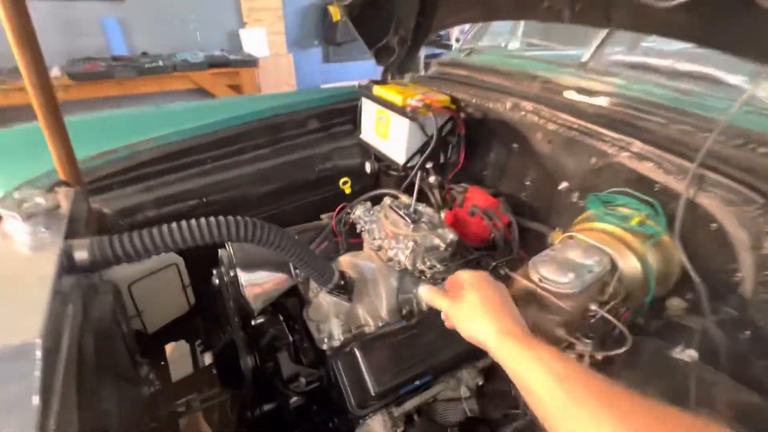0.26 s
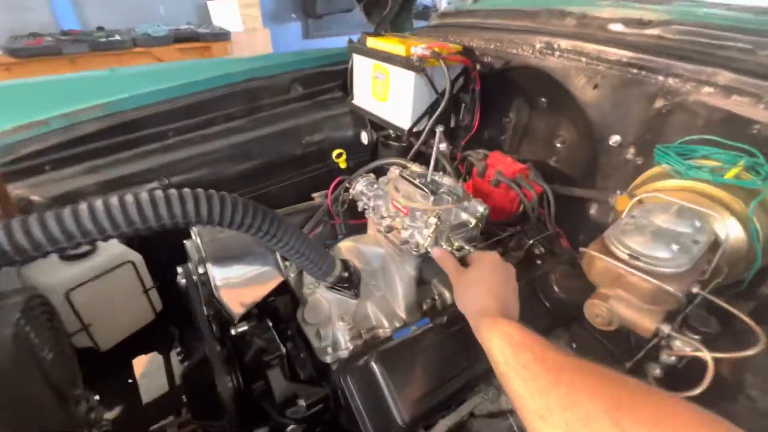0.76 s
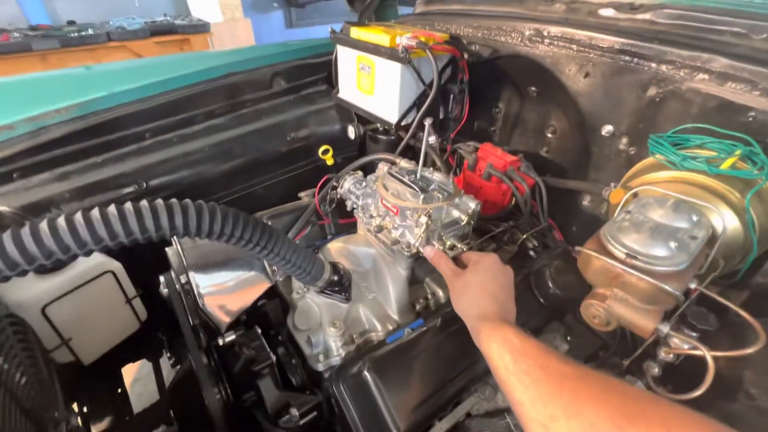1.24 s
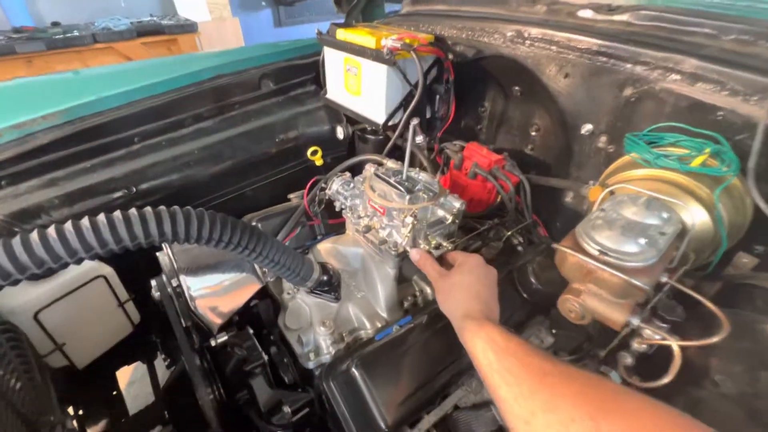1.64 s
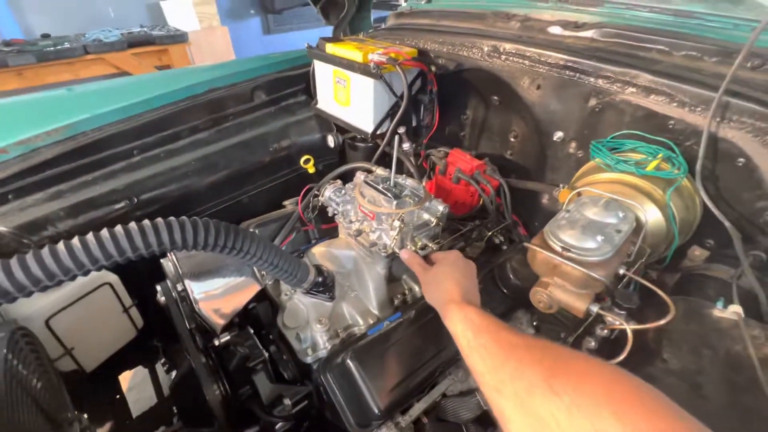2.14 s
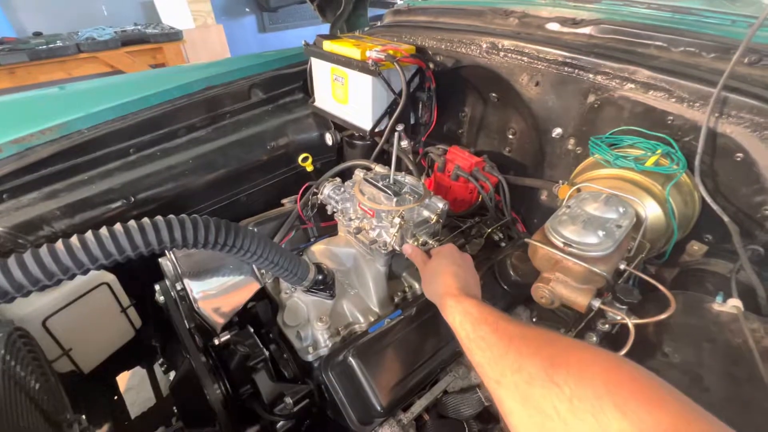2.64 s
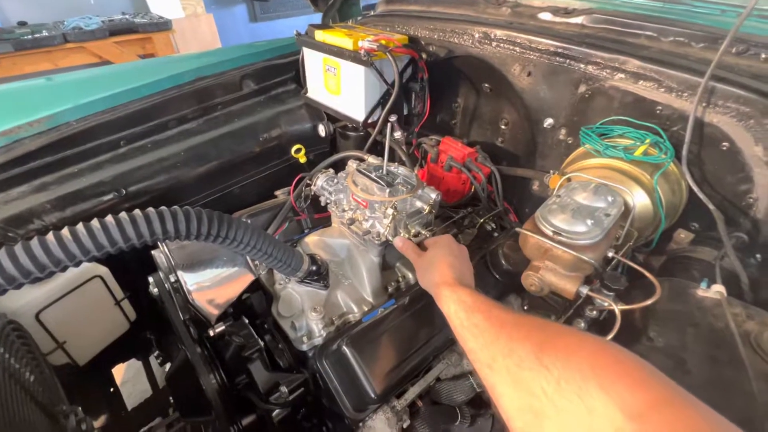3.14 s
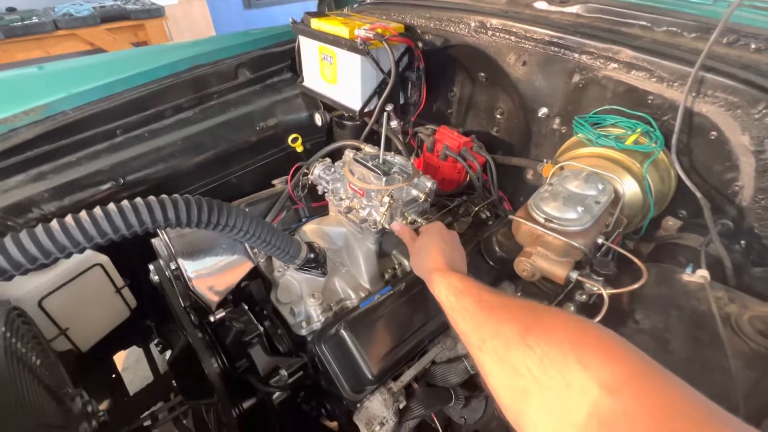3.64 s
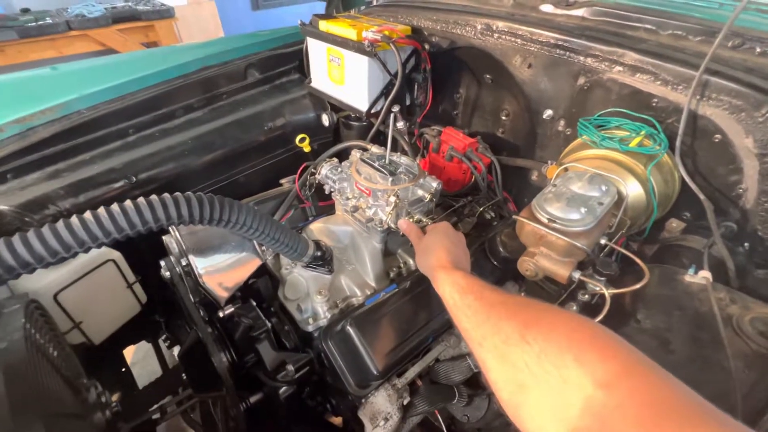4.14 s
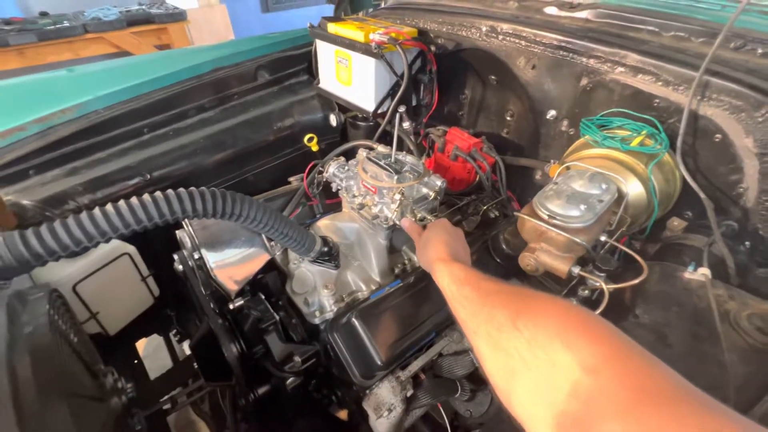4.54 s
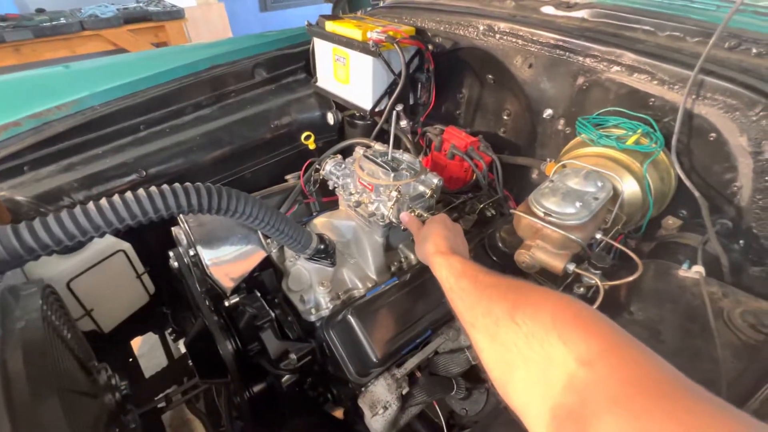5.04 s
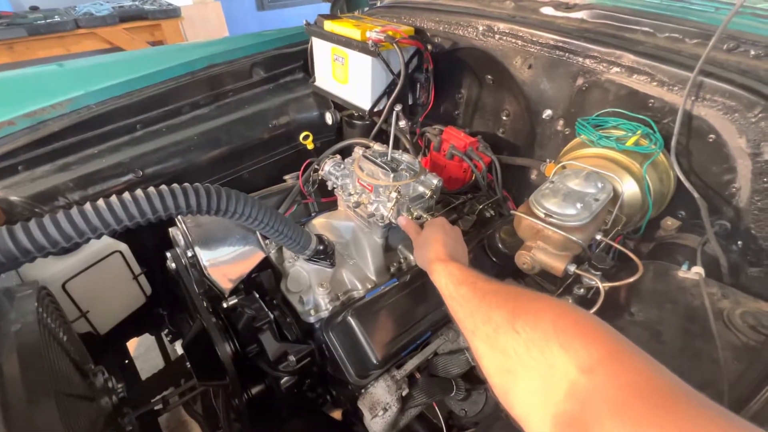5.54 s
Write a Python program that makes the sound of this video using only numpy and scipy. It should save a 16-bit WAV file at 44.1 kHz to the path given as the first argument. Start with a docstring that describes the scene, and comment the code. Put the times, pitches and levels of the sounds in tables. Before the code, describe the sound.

Close above an open engine bay, a throaty V8 burbles and is revved in four quick blips, with roaring intake air and ticking valves.

```python
"""An eight-cylinder engine runs with its bonnet open while a hand blips the throttle, heard from above the bay.
Uneven firings thud and ring the exhaust pipe; sine tones at multiples of the engine cycle follow its speed.
Shaped noise makes the air roaring into the carburettor, the fan and belt hiss, the pipe hum and throttle blasts.
Valve gear taps ring the panels, one valve ticks once a cycle in noise bursts, the intake gasps now and then,
and one metal part pings as a dying sine."""
import sys
import numpy as np
from scipy import signal
from scipy.fft import rfft, irfft, next_fast_len
from scipy.io import wavfile
from scipy.ndimage import uniform_filter1d, map_coordinates

SR = 44100
rng = np.random.default_rng(int(sys.argv[2]) if len(sys.argv) > 2 else 0)


def wav_record(signal):
    """Record a signal, one row per channel, as 16-bit PCM in the file named by sys.argv[1]."""
    frames = np.transpose(np.atleast_2d(signal))
    bounded = np.clip(frames, -1, 1)
    # unit amplitude maps onto the largest positive 16-bit level
    quanta = np.round(bounded * 32767).astype(np.int16)
    wavfile.write(sys.argv[1], SR, quanta)


N = 254898

# Engine speed: (t/s, firing rate/Hz)
SPEED = [(0, 56), (.13, 56.5), (.25, 54.5), (.6, 54), (.73, 51), (.83, 53.5), (.93, 58.5), (1.05, 59.5),
         (1.12, 62), (1.16, 85), (1.2, 92), (1.25, 103), (1.29, 114), (1.32, 117), (1.44, 120.5),
         (1.53, 92), (1.63, 79), (1.73, 67), (1.85, 62.5), (2.03, 58), (2.2, 55), (2.33, 55.5),
         (2.45, 58.5), (2.65, 60.5), (2.73, 78), (2.83, 96), (2.93, 113), (3.02, 118), (3.11, 120.5),
         (3.22, 94), (3.33, 82), (3.43, 67), (3.53, 64), (3.72, 68), (3.83, 83), (3.93, 103), (4.03, 117),
         (4.15, 121), (4.23, 110), (4.33, 91), (4.43, 81), (4.6, 79), (4.75, 81), (4.83, 87), (4.92, 107),
         (5.02, 118), (5.11, 120), (5.23, 113), (5.33, 106), (5.43, 97), (5.53, 85), (5.63, 81), (5.78, 78)]
# How hard the engine works: (t/s, load relative to full/dB)
LOAD = [(0, -11), (.15, -2.5), (.3, -8.5), (.5, -6.5), (.65, -7.5), (.85, -5), (1.03, -3), (1.12, 0),
        (1.2, 2), (1.33, 1), (1.43, -6), (1.46, -15), (1.6, -19), (1.75, -17), (2, -14), (2.15, -13.5),
        (2.33, -15), (2.42, -7.5), (2.62, -10), (2.7, -5), (2.8, 5), (2.92, -7), (3.08, -7), (3.13, -25),
        (3.23, 1), (3.33, -38), (3.45, -3), (3.65, -22), (3.78, -16), (3.88, 1), (4.02, -12), (4.12, -14),
        (4.22, -21), (4.32, -6), (4.5, -7), (4.6, -19), (4.76, -10), (4.9, 2.5), (5, 1.5), (5.08, -22),
        (5.13, -19), (5.25, -5), (5.4, -5), (5.57, -16), (5.78, -5.5)]
# Strength of each firing in the cycle: (level/dB)
CYLINDERS = [-1, -9, -9.5, 4.5, 2.5, -3, -9.5, -7.5]

# The two strongest tones: (t/s, firing note level/dB, level of the note two multiples higher/dB)
NOTE_LEVELS = [(0, -19.5, -32), (1.1, -19.5, -32), (1.18, -19, -16), (1.25, -12.5, -30), (1.31, -8, -32),
               (1.37, -8, -32), (1.42, -10.5, -32), (1.46, -19, -32), (1.6, -26, -27), (1.8, -29, -30),
               (2.5, -21, -32), (2.68, -27, -24), (2.77, -18, -16), (2.84, -12.5, -14), (2.92, -10, -28),
               (3.06, -7, -34), (3.1, -9, -32), (3.14, -19, -30), (3.25, -18, -28), (3.32, -27, -28),
               (3.45, -32, -28), (3.78, -26, -28), (3.86, -17, -16.5), (3.92, -11.5, -22),
               (4.02, -8.5, -34), (4.13, -11, -34), (4.25, -21, -21), (4.33, -17, -19), (4.5, -30, -16),
               (4.6, -28, -22), (4.75, -24, -23), (4.86, -16, -15.5), (4.92, -10.5, -30), (5, -9, -34),
               (5.1, -18, -25), (5.25, -17, -34), (5.45, -16, -22), (5.55, -23, -20), (5.68, -33, -16),
               (5.78, -30, -14)]
# Those same two tones: (multiple of the engine cycle, throb 0-1, waver/dB)
NOTE_ORDERS = [(8, .12, 1.4), (10, .15, 2)]
# Exhaust tones: (multiple of the engine cycle, level at full load/dB, gain per dB of load/dB, throb 0-1)
TONES = [(6, -31, 1, 0.3), (12, -22.5, 0.9, 0.2), (14, -22, 0.35, 0.2), (16, -10.5, 0.9, 0.22),
         (20, -21.5, 1.7, 0.4), (24, -17, 2.0, 0.3)]
# What the exhaust lets out of a tone: (f/Hz, gain/dB)
OUTLET = [(25, -27), (34, -16), (43, 0), (55, -4), (68, -14), (82, 0.5), (98, -1), (110, 3), (120, 1.4),
          (123, -10.5), (128, -22), (137, -17), (147, -18), (156, -18), (166, -13), (190, -40.5),
          (226, -16), (270, -24), (400, -35)]
WAVER_DB, STUMBLE = 1.2, 0.1  # exhaust tone waver at full load, extra waver in dB per dB of load under full
# Deep thrum: (t/s, level/dB)
THRUM_LEVEL = [(0.0, -31), (0.87, -17), (0.95, -43), (1.21, -23), (1.3, -46), (1.41, -25.5), (2.08, -25),
               (2.11, -37), (2.78, -20), (2.91, -49), (3.11, -29), (3.4, -35), (3.58, -23), (3.85, -19.5),
               (4.14, -44), (4.35, -25), (5.15, -45), (5.49, -20), (5.7, -29), (5.78, -26)]
# Tones in the thrum: (multiple of the engine cycle, level over the thrum/dB)
THRUM_ORDERS = [(4, -1.5), (6, 3.5)]

# Pitch of the air duct's hollow note: (t/s, f/Hz)
DUCT_HZ = [(0, 670), (1, 670), (1.1, 714), (1.2, 650), (1.4, 666), (2.6, 660), (2.85, 657), (3.8, 640),
           (3.9, 610), (4.05, 635), (4.2, 660), (4.35, 626), (4.9, 630), (5.08, 700), (5.3, 646),
           (5.78, 635)]
# Resonances blended by how near that pitch is: (f/Hz, width/Hz, level/dB)
DUCT = [(575, 47, -0.5), (652, 85, 0.5), (753, 36, 0.5)]
DUCT_SPREAD_HZ = 96  # this far from the pitch, a resonance is down to 1/e
# Air levels before fixed lifts: (t/s, roar/dB, hiss/dB, sizzle/dB, hollow note over this roar/dB)
AIR = [(0.0, -28, -30.5, -33, -9), (0.06, -27, -30, -36, -16), (0.37, -26, -28.5, -32.5, -6),
       (0.89, -26.5, -28.5, -34, -9), (1.01, -26.5, -24.5, -29.5, -6), (1.13, -23.5, -21, -25, 1),
       (1.16, -25, -23, -31, -4), (1.18, -22.5, -25, -30, 5.5), (1.23, -22.5, -26.5, -31.5, -6.5),
       (1.38, -26, -30.5, -35.5, -2), (1.59, -29.5, -32, -39.5, -5.5), (1.75, -30, -32, -39.5, -3.5),
       (2.28, -31.5, -31, -37, -4.5), (2.6, -28, -28.5, -33, -2), (2.75, -29, -28, -33, -2.5),
       (2.85, -24.5, -25, -32, 1.5), (3.0, -26, -30, -37, -2.5), (3.15, -27, -29, -36, -0.5),
       (3.38, -31.5, -32, -40.5, -2.5), (3.62, -31, -31, -38.5, -3), (3.85, -26.5, -27.5, -31, -3.5),
       (4.04, -27, -28, -35, 3), (4.15, -24.5, -26.5, -32, -1), (4.27, -24, -29, -34.5, 2.5),
       (4.4, -30, -30.5, -36, -2.5), (4.59, -31, -33, -41, -2.5), (4.88, -29.5, -28.5, -31.5, 2.5),
       (5.1, -23, -26.5, -32.5, -1.5), (5.28, -24.5, -28.5, -36, -1), (5.67, -30.5, -32, -38.5, -1),
       (5.78, -30, -28, -32, -3)]
# Brief intake gasps: (t/s, rise of the roar/dB, rise of the hiss and sizzle/dB)
GASPS = [(1.2, -3, 0.5), (1.259, 5, 1.5), (2.385, 4, 0), (2.655, 3, 2), (2.78, 3, 1.5), (3.04, 3, 1.5),
         (3.12, 0, -0.5), (3.43, 1, -1), (3.53, 4, -1.5), (5.26, 1.5, 1.5)]
GASP_S = 0.021  # a gasp's dB rise falls to 1/e this far from its middle
# Colours of the roar, hiss and sizzle: (f/Hz, relative level/dB)
ROAR = [(60, -1), (150, 1.5), (300, -6.5), (600, -10), (1000, -12), (1600, -11), (2500, -14.5), (4000, -25),
        (8000, -41)]
HISS = [(500, -38), (1500, 0), (2500, 0), (3600, -0.5), (4300, -4), (5500, 1), (7000, -3), (8500, -6.5),
        (10000, -6), (12000, -101), (16000, -31)]
SIZZLE = [(7000, -24), (9000, -5), (10200, -4), (11500, 0), (13500, -4), (16000, -4)]
# Panels and hollows of the engine bay: (f/Hz, width/Hz, level/dB)
BAY = [(335, 35, 1), (366, 14, 6), (524, 14, 6), (800, 120, 3), (1012, 20, 3), (1086, 20, 5), (1420, 60, 2),
       (1720, 90, -1), (1920, 140, 3), (2100, 60, 2), (2400, 200, 1), (3080, 180, 0), (3750, 200, -2),
       (5130, 260, 0), (6080, 220, 1)]

# Upper pipe hum: (t/s, level/dB)
HUM = [(0.0, -32), (1.09, -38), (1.13, -32), (1.33, -23.5), (1.51, -56), (2.28, -34.5), (2.32, -29.5),
       (2.61, -41.5), (2.96, -23.5), (3.06, -39), (3.77, -36), (3.83, -25), (4.23, -27.5), (4.31, -38),
       (4.75, -33.5), (4.78, -41), (5.04, -25), (5.78, -40)]
# Upper pipe modes: (f/Hz, width/Hz, level/dB)
UPPER = [(165, 9, -4.5), (214, 17, -3.5), (227.1, 6.2, 1), (267.3, 7.6, -4)]
# Lowest pipe mode: (f/Hz, width/Hz, level/dB)
DEEP = [(41.9, 2.7, 0)]
DEEP_DB = 0.5  # over the thrum
# Two strong pipe modes: (f/Hz, width/Hz, level/dB)
BOOM = [(119.5, 4.6, -0.88), (97.7, 5, -0.12)]
BOOM_DB, BOOM_GROWS = -20.5, 0.36  # level at full load, dB gained per dB of load

RATTLE_DB, RATTLE_SCATTER_DB, RATTLE_JITTER_S = -4.5, 5, .0015  # over AIR's roar; unevenness of the taps
# Colours of the valve's tick and its duller knock: (f/Hz, relative level/dB)
TICK = [(4000, -42), (8000, 17), (10300, -20), (11400, 32), (12500, -4), (16000, 2)]
KNOCK = [(900, -9), (1500, 6), (2200, 12.5), (2900, -36), (3800, -3), (6000, -2.5)]
TICK_DB, KNOCK_DB = 2, 6  # over AIR's sizzle, over AIR's roar
TICK_PHASE, TICK_SCATTER_DB = 0.089, 2.5  # place in the cycle (0-1), random spread of level

# Exhaust pipe modes rung by the firings: (f/Hz, width/Hz, level/dB)
PIPE = [(40.7, 4.5, -18), (84, 6.8, -1), (99.3, 20.5, -1), (123.6, 6.4, 2.5), (169, 9.4, -12),
        (240, 13, -21), (261.7, 6.6, -17)]
THUD_DB, THUD_GROWS = -17.5, 0.56  # level at full load, dB gained per dB of load

# The throttle snaps open: (middle t/s, half length to 1/e/s, bark level/dB, bright rush over the bark/dB)
BLASTS = [(1.107, 0.08, -20.5, -3), (2.85, .07, -36, 0), (4.15, 0.15, -29, -11), (5.174, 0.077, -22, -10)]
# The open throat's bark: (f/Hz, width/Hz, level/dB)
THROAT = [(722, 60, 3), (905, 50, 3), (980, 55, 7), (1170, 110, 3), (1270, 62, 6.5)]
# The bright rush: (f/Hz, width/Hz, level/dB)
VENTURI = [(2120, 65, 2.5), (2390, 58, -3.5), (3760, 89, -11.5), (4760, 300, -8.5), (6150, 500, -1)]
# A metal part rings: (t/s, f/Hz, starting level before the soft onset/dB, time to fall 60 dB/s)
PING = [(5.2, 2160, -18, .55)]

# Likeness of the noise in the two channels: (f/Hz, likeness 0-1)
ALIKE = [(60, .96), (130, .95), (290, .62), (640, .35), (1400, .35), (3100, .33), (6000, .25), (9000, .65),
         (13000, .82)]
# Balance of the two ports: (f/Hz, left over right level/dB)
LEAN = [(60, 0.0), (92, 0.0), (140, 0.0), (210, -1.5), (330, -0.5), (500, 0.0), (770, 0.0), (1170, 2.0),
        (1790, 2.5), (2740, 3.0), (4190, 5.0), (6410, 8.0), (9810, -0.5), (15000, 0.0)]
LAG_S, TOP_HZ = .00025, 15850  # the left port hears this much later; highest frequency kept


def amp(db):
    """Turn a level in dB into a gain."""
    return 10 ** (np.asarray(db) / 20)


def unit(x):
    """Scale x to an rms of 1."""
    return x / np.sqrt(np.mean(x ** 2) + 1e-20)


def along(points, hz):
    """Read (Hz, value) points on a log frequency axis."""
    f, v = np.transpose(points)
    return np.interp(np.log(hz + 1), np.log(f + 1), v)


def curves(rows):
    """Draw one value per sample for each column after the time."""
    s, *cols = np.transpose(rows)
    return [np.interp(np.arange(N) / SR, s, c) for c in cols]


def wobble(rate):
    """A smooth random curve, with rate random points a second."""
    return map_coordinates(rng.standard_normal(N // 100), [np.arange(N) * rate / SR])


def filtered(x, response):
    """Shape x with a complex response of frequency."""
    m = next_fast_len(N + SR // 2)
    return irfft(rfft(x, m) * response(np.fft.rfftfreq(m, 1 / SR)), m)[..., :N]


def modes(table, f):
    """Sum the responses of resonances, flipping the sign of every second one."""
    total = 0
    for k, (centre, width, db) in enumerate(table):
        damping = 1j * f * width
        total = total + (-1) ** k * amp(db) * damping / (centre * centre - f * f + damping)
    return total


def rush(colour, patchy_db):
    """Coloured stereo noise of rms 1, with random louder and softer patches in time and pitch."""
    grid = signal.stft(rng.standard_normal((2, N + 512)), nperseg=512)[2]
    field = uniform_filter1d(rng.standard_normal(grid.shape[1:]), size=6, axis=0)
    field = uniform_filter1d(field, size=10, axis=1)
    pair = signal.istft(grid * amp(patchy_db * unit(field)), nperseg=512)[1][:, :N]
    # a wider turn puts more sound in the side, so left and right are less alike
    turn = lambda hz: np.arccos(np.clip(along(ALIKE, hz), -1, 1)) / 2
    mid, side = filtered(pair, lambda hz: colour(hz) * [np.cos(turn(hz)), np.sin(turn(hz))])
    return unit(np.array([mid + side, mid - side]))


def resonant_rush(table, patchy_db):
    """Noise through squared resonances, which makes their peaks narrower."""
    return rush(lambda hz: np.abs(modes(table, hz)) ** 2, patchy_db)


def drone(order, level_db, throb, waver_db, cycle):
    """A sine at a multiple of the engine cycle; it throbs once and twice a cycle and wavers in level."""
    beat = 1 + throb * (np.sin(2 * np.pi * cycle) + np.sin(4 * np.pi * cycle))
    tone = np.sin(2 * np.pi * (order * cycle + rng.random()))
    return np.sqrt(2) * amp(level_db + waver_db * wobble(18)) * beat * tone


def strongest_notes(cycle):
    """The firing note and its neighbour, each sine on its own level curve."""
    rows = zip(NOTE_ORDERS, curves(NOTE_LEVELS))
    return sum(drone(order, db, throb, waver_db, cycle) for (order, throb, waver_db), db in rows)


def exhaust_tones(cycle, speed, load_db):
    """Sines that grow with load and get louder or softer as they pass through the outlet's curve."""
    total = 0
    for order, db, grows, throb in TONES:
        level_db = db + grows * load_db + along(OUTLET, order * speed)
        total = total + drone(round(order), level_db, throb, WAVER_DB - STUMBLE * load_db, cycle)
    return total


def thrum(cycle, speed, thrum_db):
    """Low multiples of the engine cycle, shaped by the outlet's curve."""
    total = 0
    for order, db in THRUM_ORDERS:
        level_db = db + thrum_db + along(OUTLET, order * speed)
        total = total + drone(round(order), level_db, 0.22, 2.5, cycle)
    return total


def duct():
    """Noise through resonances that cross-fade as the duct's hollow note moves in pitch."""
    note_hz, = curves(DUCT_HZ)
    total = 0
    for hz, width, db in DUCT:
        near = np.exp(-((note_hz - hz) / DUCT_SPREAD_HZ) ** 2)
        total = total + amp(db) * near * resonant_rush([(hz, width, 0)], patchy_db=2.0)
    return unit(total)


def air(cycle):
    """Noise for the intake roar, fan and belt hiss, sizzle and hollow duct, pulsing with the strokes."""
    roar_db, hiss_db, sizzle_db, over_db = curves(AIR)
    t = np.arange(N) / SR
    gasp_db = sum(np.outer([low_db, high_db], np.exp(-((t - s) / GASP_S) ** 2)) for s, low_db, high_db in GASPS)
    roar_db = roar_db + gasp_db[0]
    hiss_db, sizzle_db = hiss_db + gasp_db[1], sizzle_db + gasp_db[1]

    # strong cylinders pull more air
    draw = np.array(CYLINDERS)[(len(CYLINDERS) * cycle).astype(int) % len(CYLINDERS)]
    draw_db = uniform_filter1d(draw - draw.mean(), size=200)
    hollow_db = roar_db + over_db + 1.06 * wobble(17) + 0.072 * draw_db
    surge = wobble(14)  # roar, hiss and sizzle swell together
    roar_db = roar_db + 5.0 + 0.7 * surge
    hiss_db = hiss_db + 3.0 + 0.13 * surge + 0.067 * wobble(8.9)
    sizzle_db = sizzle_db + 3.0 + 0.73 * surge + 0.26 * wobble(13)

    bay = lambda hz: np.sqrt(1 + sum(np.abs(modes([mode], hz)) ** 2 for mode in BAY))
    roar = amp(roar_db) * rush(lambda hz: amp(along(ROAR, hz)) * bay(hz), patchy_db=1.3)
    hiss = amp(hiss_db) * rush(lambda hz: amp(along(HISS, hz)) * bay(hz), patchy_db=1.53)
    hollow = amp(hollow_db) * duct()
    sizzle = amp(sizzle_db) * rush(lambda hz: amp(along(SIZZLE, hz)), patchy_db=1.5)
    strokes = np.sin(2 * np.pi * len(CYLINDERS) * cycle)
    return (roar + hiss + sizzle) * amp(0.057 * draw_db) * (1 + 0.038 * strokes) + hollow


def hum(thrum_db):
    """Gas flow, made as noise, keeps the upper and lowest pipe modes sounding."""
    hum_db, = curves(HUM)
    upper = amp(hum_db) * resonant_rush(UPPER, patchy_db=0.0)
    deep = amp(thrum_db + DEEP_DB) * resonant_rush(DEEP, patchy_db=2.0)
    return upper + deep


def boom(load_db):
    """Noise through two strong pipe modes, getting louder with load."""
    return amp(BOOM_DB + BOOM_GROWS * load_db) * resonant_rush(BOOM, patchy_db=1.0)


def rattle(cycle):
    """Sixteen valves tap in turn each cycle and ring the panels; each port hears them unevenly."""
    roar_db = curves(AIR)[0]
    at = np.flatnonzero(np.diff(np.floor(2 * len(CYLINDERS) * cycle)))
    luck = rng.standard_normal((N // 100, 4))[:len(at)]
    late = np.round(RATTLE_JITTER_S * SR * np.abs(luck[:, 0])).astype(int)
    at = np.minimum(at + late, N - 1)
    # column 1 is luck shared by both ports, columns 2 and 3 belong to one port each
    sizes = [amp(RATTLE_SCATTER_DB * (luck[:, 1] + luck[:, port]) / 2) for port in (2, 3)]
    taps = np.array([np.bincount(at, size, N) for size in sizes])
    # cut the bass below 600 Hz and soften the treble above 3000 Hz
    rung = filtered(taps, lambda hz: modes(BAY, hz) * (1j * hz / (600 + 1j * hz)) ** 2 / (1 + 1j * hz / 3000))
    return amp(roar_db + RATTLE_DB) * unit(rung)


def valve(cycle):
    """Once a cycle it closes: a short bright burst of noise over a duller knock."""
    roar_db, _, sizzle_db, _ = curves(AIR)
    t = np.arange(SR // 20) / SR
    shape = (1 - np.exp(-t / 0.0021)) * amp(-60 * t / 0.073)  # quick rise, then fading at 60 dB per 0.073 s
    luck = TICK_SCATTER_DB * rng.standard_normal((N // 1000, 2))
    gates = np.zeros((2, N + SR))
    for k, at in enumerate(np.flatnonzero(np.diff(np.floor(cycle - TICK_PHASE)))):
        level_db = [sizzle_db[at] + TICK_DB, roar_db[at] + KNOCK_DB] + luck[k]
        gates[:, at:at + len(t)] += np.outer(amp(level_db), shape)
    tick = rush(lambda hz: amp(along(TICK, hz)), patchy_db=7.0)
    knock = rush(lambda hz: amp(along(KNOCK, hz)), patchy_db=3.0)
    return gates[0, :N] * tick + gates[1, :N] * knock


def firings(cycle, level_db, scatter_db, jitter_s):
    """Eight puffs a cycle, uneven from cylinder to cylinder, ring the pipe."""
    count = np.floor(len(CYLINDERS) * cycle).astype(int)
    at = np.flatnonzero(np.diff(count))
    luck = rng.standard_normal((len(at), 2))
    late = np.round(jitter_s * SR * np.abs(luck[:, 0])).astype(int)
    size = amp(np.array(CYLINDERS)[count[at] % len(CYLINDERS)] + scatter_db * luck[:, 1])
    puffs = np.bincount(np.minimum(at + late, N - 1), size, N)
    # the pipe's modes, softened above 300 Hz
    rung = filtered(puffs, lambda hz: modes(PIPE, hz) / (1 + 1j * hz / 300) ** 2)
    return amp(level_db) * unit(rung)


def blast():
    """A bark and a bright rush of air through the open throat, as swells of resonant noise."""
    t = np.arange(N) / SR
    bark, bright = sum(np.outer(amp([db, db + over_db]), np.exp(-((t - s) / half) ** 2))
                       for s, half, db, over_db in BLASTS)
    return bark * resonant_rush(THROAT, patchy_db=5.0) + bright * resonant_rush(VENTURI, patchy_db=-1.0)


def ping():
    """A metal part's sine swells fast and dies away."""
    ring = np.zeros(N)
    for s, hz, db, t60 in PING:
        t = np.maximum(np.arange(N) / SR - s, 0)
        swell = 1 - np.exp(-t / .04)
        ring += amp(db - 60 * t / t60) * swell * np.sin(2 * np.pi * hz * t)
    return ring


def scene():
    """Thuds, tones and ping are the same in both channels; noise and valve sounds spread between them."""
    (rate,), (load_db,), (thrum_db,) = curves(SPEED), curves(LOAD), curves(THRUM_LEVEL)
    speed = rate / len(CYLINDERS)  # engine cycles a second
    cycle = np.cumsum(speed) / SR  # engine cycles so far
    tones = strongest_notes(cycle) + exhaust_tones(cycle, speed, load_db) + thrum(cycle, speed, thrum_db)
    flow = air(cycle) + hum(thrum_db) + boom(load_db)
    valve_gear = rattle(cycle) + valve(cycle)
    thuds = firings(cycle, THUD_DB + THUD_GROWS * load_db, scatter_db=4.0, jitter_s=0.00074)
    return tones + flow + valve_gear + thuds + blast() + ping()


def record(dry):
    """Two ports differ in balance and delay, lose deep bass, round off peaks and stop at the top frequency."""
    balance = lambda hz: amp(np.outer([.5, -.5], along(LEAN, hz)))
    delay = lambda hz: np.exp(np.outer([-1j, 1j], np.pi * hz * LAG_S))  # half the lag on each side
    x = filtered(dry, lambda hz: balance(hz) * delay(hz) * (1j * hz / (30 + 1j * hz)) ** 3)
    x = x / (1 + np.abs(x / .95) ** 6) ** (1 / 6)  # peaks bend towards 0.95
    return filtered(x, lambda hz: hz < TOP_HZ)


dry = scene()
out = record(dry)
wav_record(out)
```